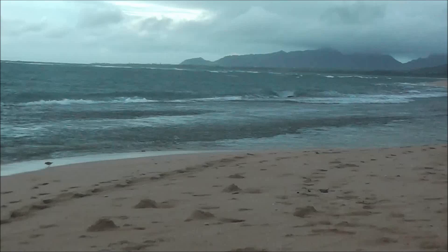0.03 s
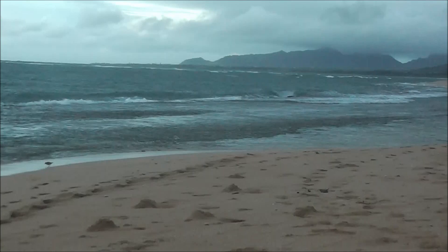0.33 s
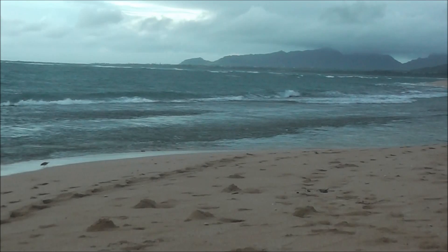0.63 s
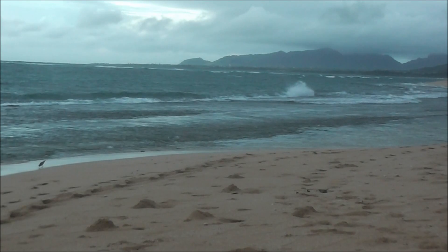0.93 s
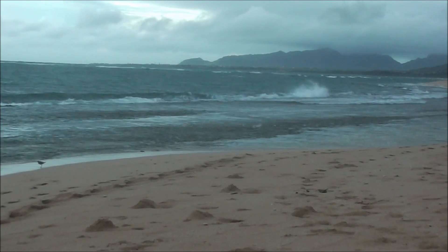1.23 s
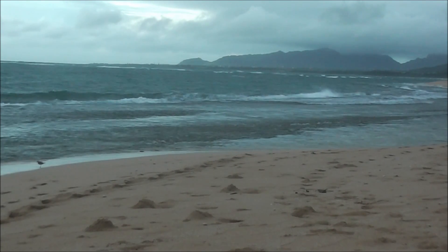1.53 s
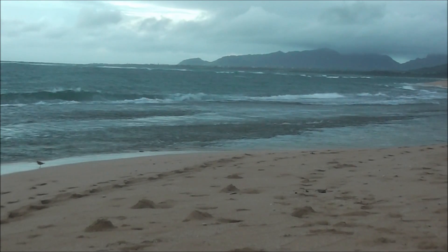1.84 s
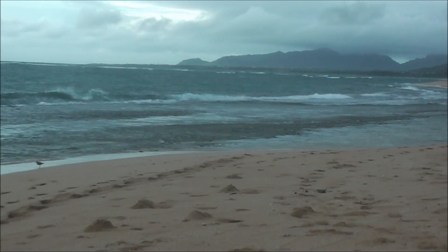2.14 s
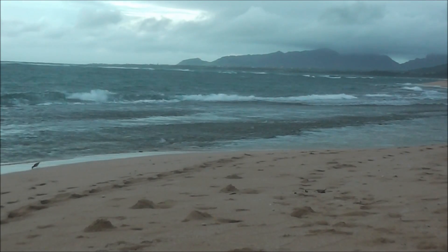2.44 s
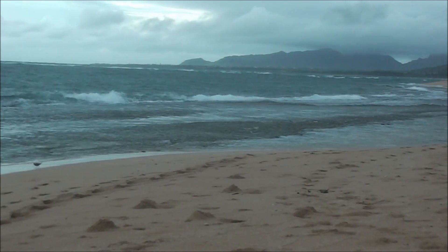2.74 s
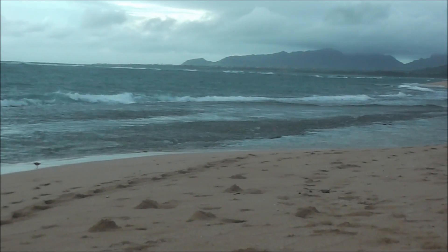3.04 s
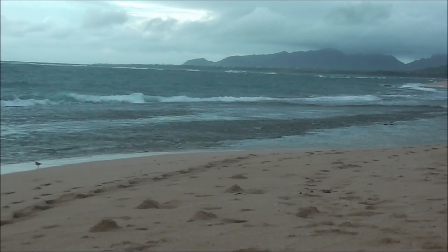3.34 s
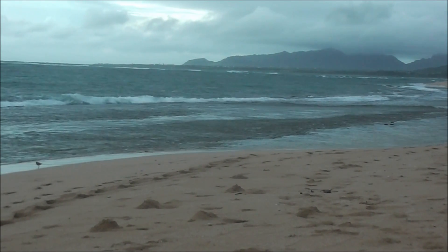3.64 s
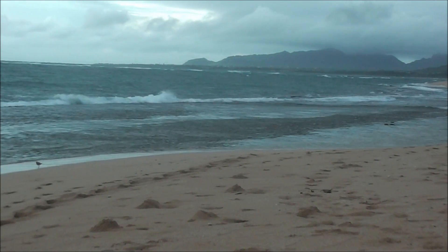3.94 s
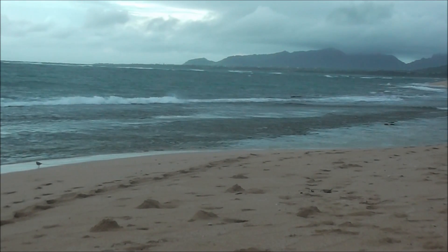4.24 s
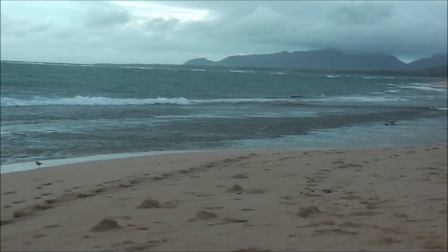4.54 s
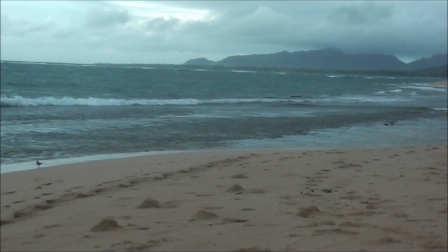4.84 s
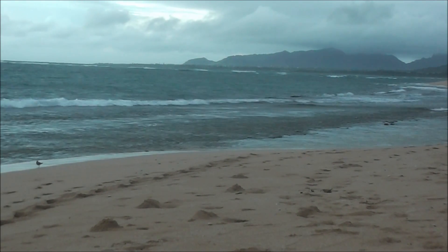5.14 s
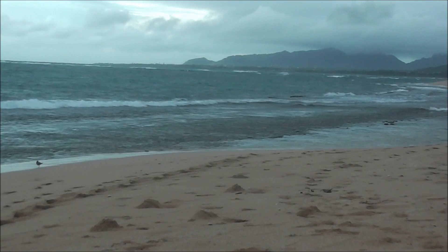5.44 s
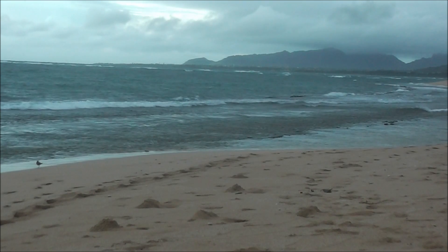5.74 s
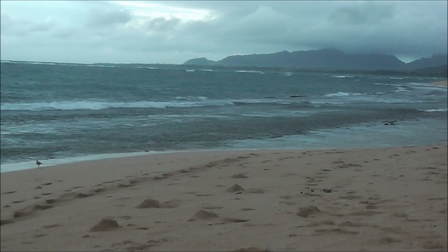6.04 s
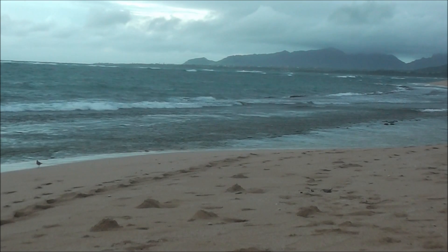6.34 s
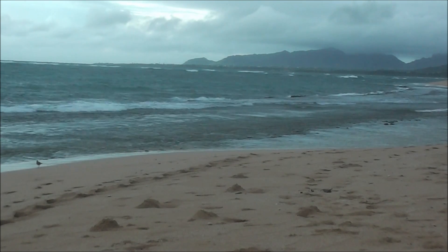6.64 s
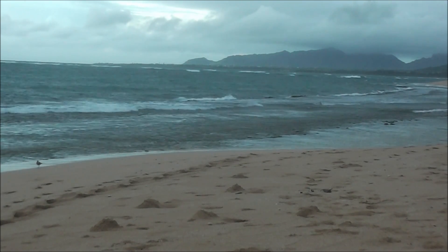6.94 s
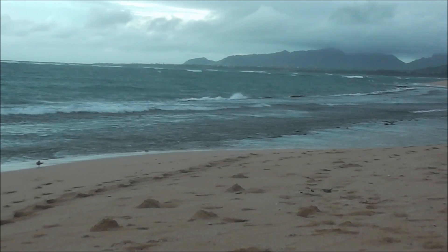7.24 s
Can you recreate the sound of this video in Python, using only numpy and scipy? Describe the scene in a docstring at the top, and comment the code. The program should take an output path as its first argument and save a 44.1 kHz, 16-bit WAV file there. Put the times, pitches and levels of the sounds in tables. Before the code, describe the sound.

Waves break and foam hisses on an open beach while wind buffets the microphone and a small bird chirps faintly.

```python
"""Surf on a windy beach

Breakers roar, crests topple and foam hisses on open sand, loudest from the left: all are bubble noise.
Gusts buffet a stereo microphone, their eddies mostly pushing its two ports in opposite directions.
A small bird chirps faintly, far to the right. The sound cuts in after half a second of silence."""
import sys
import numpy as np
from scipy import signal
from scipy.fft import rfft, irfft
from scipy.io import wavfile
from scipy.ndimage import uniform_filter1d

SR = 44100
rng = np.random.default_rng(int(sys.argv[2]) if len(sys.argv) > 2 else 0)


def digitize_waveform(pressure):
    """Quantize a signal to 16-bit integers and store it at the path in sys.argv[1].

    Rows of a 2-D input are taken as channels; values are limited to [-1, 1].
    """
    field = np.atleast_2d(pressure).T
    bounded = np.clip(field, -1, 1)
    quanta = np.round(bounded * 32767).astype(np.int16)
    wavfile.write(sys.argv[1], SR, quanta)


N = 330750
TIME = np.arange(N) / SR
HZ = np.maximum(np.arange(N // 2 + 1) * SR / N, 1)

# Colour of the surf. Each row: frequency in Hz, relative spectral density in dB.
SURF_SPECTRUM = [(250, 0.5), (450, -1), (750, -2.5), (1050, -2.5), (1450, -4.0), (2000, -8.5), (2750, -17),
                 (3800, -15.5), (5000, -17), (7500, -19.5), (8800, -20.5), (10900, -21), (12100, -25),
                 (13300, -29), (15300, -36)]
# The surf at the two microphone ports. Each row: frequency in Hz, left over right in dB,
# coherence from 0 to 1, phase lead of the left in radians.
SURF_AT_PORTS = [(450, 2, 0.85, -0.26), (750, 3, 0.83, 0.21), (1200, 5, 0.87, .5), (2200, 6, 0.48, 0.5),
                 (3300, 7.5, 0.48, -0.17), (5350, 7, 0.3, -1.2), (6900, 8, 1, -1.85), (8600, 7, 0, 0),
                 (10250, 5.5, 0.34, -5), (13000, -1, 0, 8), (15000, 1, 0, 8)]
# One wave breaks and dies away, the next washes slowly in.
# Each row: time in seconds, then relative levels of roar, foam and spray in dB.
WAVE_LEVELS = [(0.55, -23, -29.5, -38.5), (.95, -22, -29.5, -37), (1.4, -20.5, -26, -31),
               (1.55, -20, -25, -30), (1.68, -22, -27.5, -36), (2.15, -25.5, -30.5, -41.5),
               (2.55, -23.5, -30.5, -37), (3.1, -26.5, -33, -40), (3.7, -27.5, -35.5, -44),
               (4.4, -25.5, -32.5, -41), (4.75, -27, -34.5, -42), (5.5, -25, -30.5, -39.5),
               (6.3, -24, -29.5, -38.5), (6.8, -23, -28.5, -40), (7.06, -21.5, -27, -37.5),
               (7.14, -26, -30.5, -39), (7.5, -25.5, -30, -40.5)]
# The airy top of the hiss lingers as the foam dissolves. Each row: time in seconds, level in dB.
AIRY_HISS = [(.55, -66), (1.3, -66), (1.7, -59), (2.2, -58.5), (3.1, -61.5), (3.6, -72), (5.0, -72),
             (6.4, -62), (7.5, -61.5)]
# The foam runs out to the left, then draws back. Each row: time in seconds, left over right in dB.
FOAM_PAN = [(.55, -0.5), (1.1, -0.5), (1.6, 1.5), (2.1, 2), (2.8, 0.2), (3.4, 0.2), (3.8, -1.5), (4.5, -2),
            (4.9, 0), (5.5, 0.2), (7.5, 0)]
# The highest hiss switches between sounding wide and sounding centred.
# Each row: time in seconds, gain of sides over centre in dB.
TREBLE_WIDTH = [(.7, -17), (.85, 4), (1.55, 5), (1.9, 13), (3.3, 8), (3.75, -15), (4.1, 9), (4.6, -14),
                (4.95, 11), (5.15, -21), (6.6, -16), (7.5, -2)]

# Strength of the breeze between gusts. Each row: time in seconds, relative level in dB.
BREEZE_LEVELS = [(.55, -15.5), (1.6, -28.5), (2.3, -19.5), (3.3, -22.5), (3.9, -21.5), (4.5, -19.5),
                 (5.2, -16), (5.9, -23.5), (6.7, -18.5), (7.5, -22)]
# The breeze veers slowly between the ports. Each row: time in seconds, left over right in dB.
BREEZE_PAN = [(.55, 0.5), (3.2, -1), (4.4, 0), (7.5, -1)]
# The wind drops for a moment. Each row: centre time in seconds, length in seconds.
BREEZE_LULLS = [(1.86, 0.08), (2.445, 0.12), (2.883, 0.12), (3.642, 0.086), (4.995, 0.034), (5.168, .035),
                (5.357, 0.17), (5.503, 0.058), (6.554, 0.094), (6.89, 0.058), (7.235, 0.043)]
# Gusts on the microphone. Each row: peak time in seconds, relative level in dB, Gaussian half width
# in seconds, brightness (weight of fast eddies over slow) in dB, left over right in dB.
WIND_GUSTS = [(0.584, -16, 0.045, -13, 2), (0.684, -9, 0.016, -6, -0.5), (0.805, -11.5, 0.0069, -11, -2),
              (0.899, -13, 0.012, -19, -6), (1.02, -10.5, 0.015, -11, -7.5), (1.16, -15, 0.016, -12, -5),
              (1.34, -12, 0.0093, -17, -3), (1.448, -12, 0.019, -8, -3), (1.54, -13, 0.014, -7, 1),
              (1.618, -12.5, 0.031, -6, -2.5), (1.781, -10, 0.006, -6, -3), (1.982, -12.5, 0.013, -14, -1),
              (2.05, -14, 0.028, -8, -0.5), (2.114, -13, 0.015, -7, -3.5), (2.223, -14.5, 0.0076, -6, -2),
              (2.314, -13.5, 0.012, -6, -7), (2.366, -16, 0.0081, -9, -8), (2.51, -24, .009, -18, -6),
              (2.63, -28, 0.015, -9, -6), (2.683, -13.5, 0.013, 2, -5), (2.724, -11, .009, -11, -3),
              (2.769, -12.5, 0.0067, -14, -7), (2.806, -19, .008, -18, -4), (2.97, -17, 0.01, -3, 0),
              (3.084, -13.5, 0.0079, -6, -6.5), (3.144, -13, 0.01, -6, -7.5),
              (3.252, -13.5, 0.025, -3.5, -7), (3.332, -13, 0.021, -11, -2), (3.529, -7, 0.0094, 1, -4),
              (3.708, -13, 0.01, -5, -1.5), (4.199, -16.5, 0.014, -5, -2.5), (4.3, -12, 0.0073, -2, -1),
              (4.537, -14, 0.014, 5, 1), (4.625, -18, .011, -11, 7), (4.91, -15.5, 0.013, -12, -6),
              (5.027, -16, 0.007, -17, -11.5), (5.103, -10.5, 0.01, 3, 8), (5.123, -10.5, 0.01, 3, 6),
              (5.21, -10.5, 0.015, 2, 4), (5.25, -12, 0.015, -4, 6), (5.444, -8, 0.011, -4, -4),
              (5.555, -12, 0.0069, -18, 3), (5.713, -14, 0.012, -3, 2), (5.755, -16, 0.0092, -9, -5),
              (5.987, -15, 0.018, -9, -1), (6.282, -7.5, 0.0071, -1, -0.5), (6.336, -14.5, .022, -8, -1),
              (6.402, -16, 0.011, 3, -4), (6.454, -20, 0.011, -2, 0), (6.927, -14, 0.008, -6, 5),
              (6.984, -13.5, .008, -12, 7), (7.06, -12, 0.032, -3, 5.5), (7.109, -11.5, .009, 5, 7),
              (7.144, -10.5, .014, 1, 4.5), (7.19, -13, .012, -10, 2), (7.285, -14.5, 0.016, -7, -3),
              (7.359, -8, 0.01, -3, -2), (7.397, -11, .009, -6, -1), (7.466, -12.5, 0.011, 1, 3)]
# Rumble of the slow eddies. Each row: frequency in Hz, relative spectral density in dB.
SLOW_EDDY_SPECTRUM = [(12, -27), (25, -7.5), (45, -7), (75, -4), (120, -1), (170, 0), (235, -2.5),
                      (320, -9.5), (480, -27), (900, -50), (2000, -76)]
# Flutter of the small fast eddies. Each row: frequency in Hz, relative spectral density in dB.
FAST_EDDY_SPECTRUM = [(120, -24), (250, 0), (350, -1), (490, -1), (680, -13.5), (1200, -17), (2000, -41),
                      (3500, -34), (8000, -65)]

# Single crests topple. Each row: peak time in seconds, level in dB, Gaussian half width in seconds.
TOPPLING_CRESTS = [(0.64, -20, 0.027), (1.55, -27, 0.033), (1.942, -26.5, 0.051), (2.347, -31.5, 0.1),
                   (2.595, -30, 0.092), (3.086, -27.5, 0.086), (3.42, -31, 0.1), (4.2, -33.5, 0.34),
                   (6.95, -47, 0.052)]
# The bird's notes, often a high one and then a lower. Each row: centre time in seconds,
# centre pitch in Hz, relative level in dB, length in seconds, glide in Hz per second.
CHIRPS = [(0.763, 5100, -34, .07, -10000), (1.097, 4050, -32, .035, -12000),
          (1.328, 5200, -32, 0.045, 14000), (1.362, 4550, -34, .04, -5000), (1.408, 5400, -31, .045, 0),
          (1.865, 5200, -36, 0.068, 6000), (2.943, 5150, -35, .07, -15000), (3.662, 5030, -35, .1, -3000),
          (3.753, 4100, -38, .06, -8000), (4.17, 5300, -41, .06, 4000), (4.418, 5060, -31.5, .07, -10000),
          (4.502, 4150, -34, .055, 0), (5.098, 5000, -36, .09, -4000), (5.157, 4320, -36, .05, -7000),
          (5.526, 5550, -32, .1, -5000), (5.627, 4700, -34, .055, -16000),
          (6.057, 4920, -28, 0.072, -30000), (6.153, 4630, -30.5, .065, -2000),
          (6.682, 5550, -31, .04, -10000), (6.765, 5150, -34, .055, -12000), (6.855, 4950, -30, .07, 0),
          (6.95, 4800, -27, .06, -10000)]


def from_db(db):
    """Amplitude grows tenfold with every 20 dB."""
    return 10 ** (np.asarray(db) / 20)


def unit_rms(x):
    """Dividing by the rms gives a signal unit mean power."""
    return x / np.sqrt(np.mean(x ** 2) + 1e-20)


def in_time(rows):
    """Linear interpolation gives each column of a table at every sample."""
    times, *columns = np.transpose(rows)
    return [np.interp(TIME, times, column) for column in columns]


def in_frequency(rows):
    """Interpolation on a log axis gives each column of a table at every frequency."""
    hz, *columns = np.transpose(rows)
    return [np.interp(np.log(HZ), np.log(hz), column) for column in columns]


def drift(rate_hz):
    """Low-passed noise of unit rms wanders about rate_hz times a second."""
    coarse_times = np.arange(0, N, 50) / SR
    count = len(coarse_times)
    hz = np.arange(count // 2 + 1) * SR / N
    slow = irfft(rfft(rng.standard_normal(count)) / (1 + (hz / rate_hz) ** 2), count)
    return np.interp(TIME, coarse_times, unit_rms(slow))


def below(edge_hz, order=8):
    """A soft low-pass edge passes this share of the power at each frequency."""
    return 1 / (1 + (HZ / edge_hz) ** order)


def panned(lean_db):
    """A level difference between left and right gains places a sound to one side."""
    return from_db(lean_db / 2 * np.array([[1], [-1]]))


def widened(pair, width_db):
    """Stereo width follows the ratio of the difference signal to the sum."""
    side_gain = from_db(width_db)
    centre = (pair[0] + pair[1]) / 2
    sides = side_gain * (pair[0] - pair[1]) / 2
    return np.array([centre + sides, centre - sides]) * np.sqrt(2 / (1 + side_gain ** 2))


def burst_spectrum(per_s, spread_db):
    """Bubble bursts of uneven size at random times make shot noise, whose spectrum is white."""
    sizes = from_db(spread_db * np.minimum(rng.exponential(1, N), 4)) * rng.choice([-1, 1], N)
    bursts = rng.random(N) < per_s / SR
    return rfft(unit_rms(sizes * bursts))


def bubbles(band, per_s, spread_db, churn_db, churn_hz):
    """One range of bubble sizes fills one band of noise, with rms near 1, swelling as the water churns."""
    lean_db, coherence, lead = in_frequency(SURF_AT_PORTS)
    colour = from_db(in_frequency(SURF_SPECTRUM)[0]) * np.sqrt(band)
    left = burst_spectrum(per_s, spread_db)
    # the shore is wide, so the right port shares only part of what reaches the left
    shared = coherence * left * np.exp(-1j * lead)
    right = shared + np.sqrt(1 - coherence ** 2) * burst_spectrum(per_s, spread_db)
    pair = irfft(colour * panned(lean_db) * np.array([left, right]), N)
    return unit_rms(pair) * from_db(churn_db * drift(churn_hz))


def surf(surge_db=5, surge_end_s=0.647, surge_fall_s=0.028):
    """Smaller bubbles ring higher: big air pockets boom, breakers roar, foam hisses, spray fizzes."""
    roar_db, foam_db, spray_db = in_time(WAVE_LEVELS)
    (air_db,), (width_db,), (lean_db,) = in_time(AIRY_HISS), in_time(TREBLE_WIDTH), in_time(FOAM_PAN)
    floor, deep, middle = below(64, order=4), below(640), below(2280)
    high, top = below(9150, order=12), below(14800, order=40)
    boom = bubbles(deep * (1 - floor), per_s=9000, spread_db=2, churn_db=1.27, churn_hz=11)
    roar = bubbles(middle * (1 - deep), per_s=12000, spread_db=2, churn_db=0.43, churn_hz=4.5)
    foam = bubbles(high * (1 - middle), per_s=20000, spread_db=2.5, churn_db=0.57, churn_hz=12)
    spray = bubbles(1 - high, per_s=16000, spread_db=3.5, churn_db=1.5, churn_hz=5.1)
    air = bubbles(1 - top, per_s=16000, spread_db=3, churn_db=0.6, churn_hz=8)
    breakers = from_db(roar_db - 1.46) * boom + from_db(roar_db + 0.5) * roar
    breakers *= panned(0.1 * (foam_db - foam_db.mean()))   # the waves break on the left
    wash = from_db(foam_db + 1.26) * foam + from_db(air_db) * air
    wash += from_db(spray_db - 2.4) * widened(spray, width_db)
    surge = np.clip(1 - (TIME - surge_end_s) / surge_fall_s, 0, 1)   # the first moment is louder
    return (breakers + wash * panned(lean_db)) * from_db(surge_db * surge)


def eddies(spectrum, power, lump_db, lump_hz, common_db, steady_s):
    """Turbulence makes lumpy pressure that drives the two ports mostly in antiphase."""
    colour = from_db(in_frequency(spectrum)[0])
    lumps = from_db(lump_db * drift(lump_hz))
    opposed, common = irfft(rfft(lumps * rng.standard_normal((2, N))) * colour, N)
    pressure = opposed * np.array([[1], [-1]]) + from_db(common_db) * common
    # over a few eddies the strength is set by the wind's power alone
    window = int(steady_s * SR)
    local_power = uniform_filter1d(uniform_filter1d(np.mean(pressure ** 2, axis=0), window), window)
    return np.sqrt(power) * pressure / np.sqrt(local_power + 1e-12)


def wind(lull_db=-11, restless_db=1.5, restless_hz=23, breeze_bright_db=-8.5):
    """Breeze and gusts add in power; each gust has its own mix of low rumble and brighter flutter."""
    (breeze_db,), (veer_db,) = in_time(BREEZE_LEVELS), in_time(BREEZE_PAN)
    calm = sum(np.exp(-(2 * (TIME - at_s) / length_s) ** 4) for at_s, length_s in BREEZE_LULLS)
    breeze = from_db(breeze_db + lull_db * calm + restless_db * drift(restless_hz)) * panned(veer_db)
    slow_power = breeze ** 2
    fast_power = (breeze * from_db(breeze_bright_db)) ** 2
    for at_s, peak_db, half_s, bright_db, lean_db in WIND_GUSTS:
        on = np.abs(TIME - at_s) < 4 * half_s
        peak_power = (from_db(peak_db) * panned(lean_db)) ** 2
        swell = peak_power * np.exp(-0.5 * ((TIME[on] - at_s) / half_s) ** 2)
        fast_share = 1 / (1 + from_db(-bright_db) ** 2)
        slow_power[:, on] += swell * (1 - fast_share)
        fast_power[:, on] += swell * fast_share
    rumble = eddies(SLOW_EDDY_SPECTRUM, slow_power,
                    lump_db=4.5, lump_hz=85, common_db=-10.5, steady_s=0.017)
    flutter = eddies(FAST_EDDY_SPECTRUM, fast_power,
                     lump_db=5, lump_hz=180, common_db=-8.5, steady_s=0.038)
    return from_db(-0.14) * rumble + from_db(-3) * flutter


def crests(low_hz=925, high_hz=1350):
    """Large bubbles resonate in a narrow band, so each toppling crest makes a hollow rush."""
    power = sum(from_db(peak_db) ** 2 * np.exp(-0.5 * ((TIME - at_s) / half_s) ** 2)
                for at_s, peak_db, half_s in TOPPLING_CRESTS)
    band = below(high_hz, order=14) * (1 - below(low_hz, order=14))
    return np.sqrt(power) * bubbles(band, per_s=5500, spread_db=1, churn_db=1.1, churn_hz=10)


def bird(rasp_hz=270, rasp_rate_hz=500, echo_db=-8, echo_t60_s=0.28):
    """Random frequency modulation makes gliding notes raspy; scattering on the way blurs them."""
    song = np.zeros(N)
    rasp = rasp_hz * drift(rasp_rate_hz)
    for at_s, hz, level_db, length_s, glide in CHIRPS:
        on = np.abs(TIME - at_s) < length_s / 2
        t = TIME[on] - at_s
        pitch = hz + glide * t + rasp[on]
        envelope = from_db(level_db) * np.cos(np.pi * t / length_s)
        song[on] += envelope * np.sin(2 * np.pi * np.cumsum(pitch) / SR)
    tail_s = TIME[:SR // 2]
    scatter = rng.standard_normal((2, len(tail_s))) * np.exp(-np.log(1000) * tail_s / echo_t60_s)
    scatter /= np.sqrt(np.sum(scatter ** 2, axis=1, keepdims=True))
    echoes = signal.fftconvolve(song[None], scatter, axes=1)[:, :N]
    return (song + from_db(echo_db) * echoes) * from_db([[-9], [-0.5]])   # louder on the right


def scene():
    """By superposition, the pressures of sea, wind and bird add at each port."""
    return surf() + crests() + wind() + bird()


def record(dry, start_s=0.541, fade_s=0.003, cutoff_hz=15450):
    """The sound cuts in, buffets beyond full scale clip, and a steep low-pass removes the top."""
    fade_in = np.clip((TIME - start_s) / fade_s, 0, 1)
    clipped = np.clip(dry * fade_in, -1, 1)
    low_pass = signal.ellip(10, 0.1, 80, cutoff_hz, fs=SR, output="sos")
    return signal.sosfilt(low_pass, clipped)


dry = scene()
out = record(dry)
digitize_waveform(out)
```